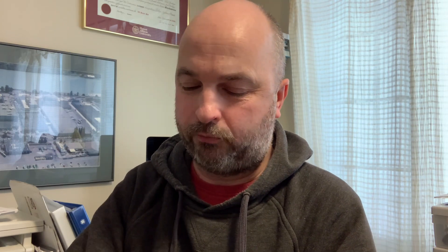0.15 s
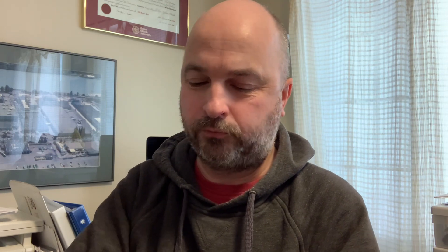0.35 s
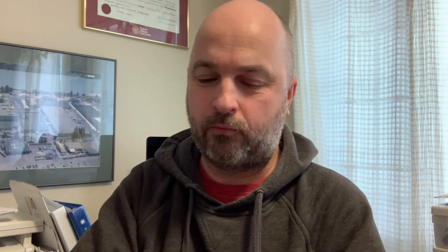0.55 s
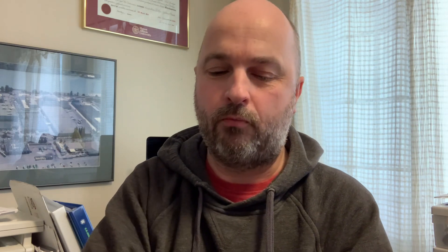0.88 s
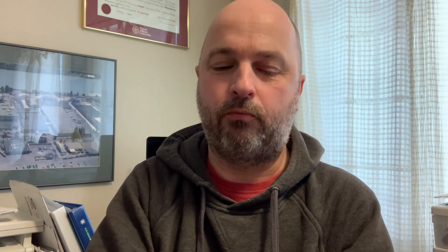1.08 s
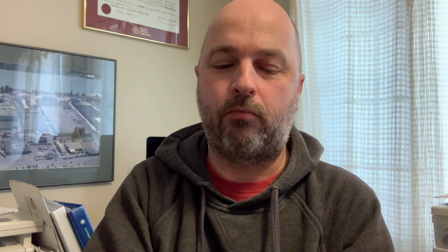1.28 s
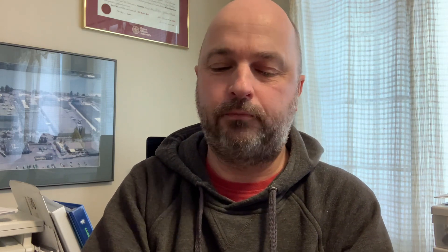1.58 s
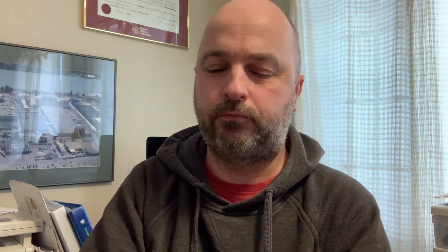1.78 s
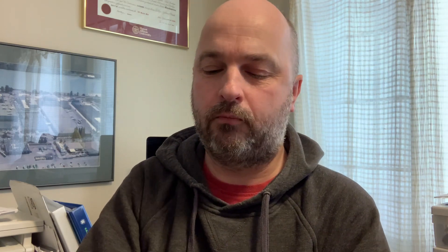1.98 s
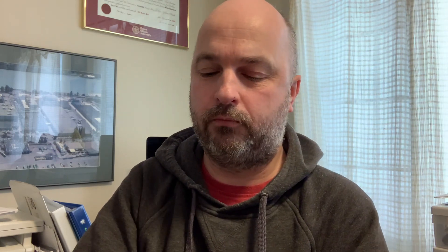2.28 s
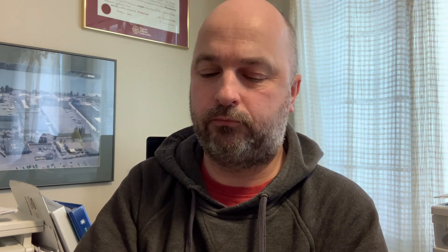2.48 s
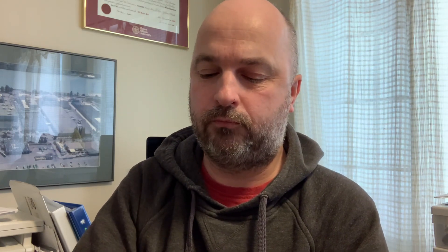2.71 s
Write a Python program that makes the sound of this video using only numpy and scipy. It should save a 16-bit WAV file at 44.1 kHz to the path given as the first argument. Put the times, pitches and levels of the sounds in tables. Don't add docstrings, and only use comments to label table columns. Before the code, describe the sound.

Crisp plastic film being gripped, twisted and pulled open, snapping and crackling in a quiet office

```python
import sys
import numpy as np
from scipy import signal
from scipy.fft import rfft, irfft, next_fast_len
from scipy.io import wavfile

SR = 44100
rng = np.random.default_rng(int(sys.argv[2]) if len(sys.argv) > 2 else 0)


def gain_from_db(level_db):
    decades = np.asarray(level_db, float) / 20
    return 10 ** decades


def int16_out(signal):
    q = np.round(np.clip(np.atleast_2d(signal).T, -1, 1) * 32767)
    wavfile.write(sys.argv[1], SR, q.astype(np.int16))


N = 125685


def rms_one(x):
    return x / np.sqrt(np.mean(x ** 2) + 1e-20)


def at_hz(points, hz):
    table_hz, value = np.array(points)[:, :2].T
    return np.interp(np.log(hz + 1), np.log(table_hz), value)


def drift(rate):
    r = np.exp(-80 * np.pi * rate / SR)
    white = rng.standard_normal(N // 40 + 2002)
    slow = signal.lfilter([1], [1, -2 * r, r * r], white)[2000:]
    return np.interp(np.arange(N) / 40, np.arange(len(slow)), rms_one(slow))


def band(x, low, high):
    return signal.sosfilt(signal.butter(2, [low, high], "band", fs=SR, output="sos"), x)


def room_tone():
    # frequency_hz, level_db per Hz
    air_colour = [(25, -25), (70, -1), (150, -7.5), (300, -4.5), (900, -9.5), (3300, -14.5), (8500, -14.5),
                  (15000, -16.5)]
    air_db, hum_db = -59, -75
    hum_hz, hum_width_hz = 148.87, 18.2
    hz = np.arange(N // 2 + 1) * SR / N
    white = rfft(rng.standard_normal((2, 2, N)))
    air = rms_one(irfft(white[0] * gain_from_db(at_hz(air_colour, hz)) * (hz > 15), N))
    resonance = 1 / (1 + ((hz - hum_hz) / hum_width_hz * 2) ** 2)
    hum = rms_one(irfft(white[1] * resonance, N))
    lumps = band(air, 32, 731) * (gain_from_db(4.5 * drift(11)) - 1)
    return gain_from_db(air_db) * (air + lumps) + gain_from_db(hum_db + 2 * drift(2)) * hum


def drag():
    # frequency_hz, level_db
    hollows = [(710, -59.5), (1900, -68)]
    width_hz, end_s = 83.5, 0.144
    rub = 0
    for hz, db in hollows:
        friction = band(rng.standard_normal(N), hz - width_hz / 2, hz + width_hz / 2)
        rub = rub + gain_from_db(db) * rms_one(friction)
    return rub / (1 + (np.arange(N) / SR / end_s) ** 6)


def creases(s, db, low_db, high_db, pitch_hz):
    # frequency_hz, level_db per Hz
    film_colour = [(400, -21.5), (700, -3), (1300, 0), (3000, -4), (6000, -4), (9000, 9.5), (12500, -8.5),
                   (15500, -10)]
    patch_db, ring_db, ring_octaves = 1.5, 11, 0.262
    snap_t60_s, snap_cycles = .0036, 4
    rise_s, late_cycles = .0002, -1.0
    swell_db, swell_s = -14.5, 0.00145
    click_hz = 1800

    edges = 400 * 2 ** np.arange(0, 5.5, 1 / 3)
    patch = patch_db * rng.standard_normal((len(s), 16))
    sign = rng.choice([-1, 1], (len(s), 16))
    rise = np.exp(-1 / (rise_s * SR))
    swell = np.exp(-1 / (swell_s * SR))
    white = rng.standard_normal((2, 2, N))
    out = 0
    for k, (low, high) in enumerate(zip(edges, edges[1:])):
        hz = np.sqrt(low * high)
        to_low, to_high = np.clip(np.log2([3000 / hz, hz / 5000]) / [2, 1], 0, 1)
        level_db = db + to_low * low_db + to_high * high_db + at_hz(film_colour, hz) + patch[:, k]
        octaves_off = np.log2(hz / pitch_hz)
        level_db = level_db + ring_db * np.exp(-.5 * (octaves_off / ring_octaves) ** 2)

        at = np.clip(((s + late_cycles / hz) * SR).astype(int), 0, N - 1)
        power, clicks = np.full(N, 1e-18), np.zeros((2, N))
        np.add.at(power, at, gain_from_db(2 * level_db))
        np.add.at(clicks[0], at, gain_from_db(level_db) * sign[:, k])

        before = gain_from_db(2 * swell_db) * signal.lfilter([1], [1, -swell], power[::-1])[::-1]
        fade = gain_from_db(-2 * 60 / ((snap_t60_s + snap_cycles / hz) * SR))
        after = signal.lfilter([1 - rise], np.convolve([1, -fade], [1, -rise]), power)
        burst = np.sqrt(after + before) * white[k % 2]
        clean = np.array([[1 / (1 + (hz / click_hz) ** 2)], [0]])
        snap = np.sqrt(1 - clean) * burst + np.sqrt(clean / (1 - fade)) * clicks
        out = out + band(snap, low, high)
    return out * np.sqrt(SR / 2 / 4500)


def wrapper():
    # start_s, level_db, low_share_db,
    # high_share_db, pitch_hz
    film_snaps = [(0.0153, -57.5, 22, 19, 2140), (0.0815, -36.5, -20.5, 6, 600),
                  (0.2211, -27, -15, 2.5, 584), (0.2482, -31, 3, -2.5, 1010),
                  (0.2785, -47.5, -2, 15.5, 4210), (0.2915, -32, -7.5, 0.5, 600),
                  (0.3134, -38, -12, 7, 600), (0.322, -31, -4, -1.5, 908), (0.3377, -25.5, -8.5, -18, 963),
                  (0.353, -24, -9, -16, 914), (0.3601, -13.5, -16, -10.5, 710),
                  (0.3788, -37, -12.5, -10, 600), (0.3962, -18, -18.5, -8.5, 644),
                  (0.4029, -21.5, 5, 7.5, 4400), (0.4685, -32.5, -13.5, -11, 600),
                  (0.489, -25.5, -13.5, 4.5, 3615), (0.5354, -27.5, 1, 1.5, 2956),
                  (0.5482, -20.5, -7.5, -19.5, 587), (0.5578, -19, -17.5, -10, 595),
                  (0.5621, -23, -9, -11, 596), (0.5967, -31, -2.5, 8, 600), (0.604, -20, -21, -3, 600),
                  (0.629, -29, -20.5, 1, 600), (0.6608, -16, -9.5, -11.5, 1266),
                  (0.675, -29.5, -9, -9, 1316), (0.7422, -42, -1, -3, 4990), (0.7594, -37, -9, -6.5, 2520),
                  (0.7971, -42, 0.5, -6, 4580), (0.8019, -28, 6, 2, 2890), (0.818, -47.5, 8.5, 9.5, 3550),
                  (0.8294, -47, 3, 12.5, 5050), (0.84, -32, -22, 1.5, 600),
                  (0.8445, -31, -11.5, -2.5, 1010), (0.8561, -43.5, -16.5, 8, 650),
                  (0.8643, -32.5, -4.5, 14, 2970),
                  (0.8694, -31.5, -8, 6, 713), (0.8837, -40.5, -4.5, 19, 2760),
                   (0.9797, -43.5, -6.5, -17.5, 2132), (0.994, -51, 12, -14.5, 3270),
                   (1.016, -42, 2.5, 4.5, 650), (1.0274, -50.5, 4.5, 11.5, 4978),
                   (1.038, -32.5, -5.5, 3, 1800), (1.0523, -28, -7.5, 3, 6000), (1.0601, -35, 2, 0, 1410),
                   (1.0721, -32.5, -7, 13, 603), (1.082, -36, 10.5, -1, 1820), (1.1126, -48, -6, 6.5, 5430),
                   (1.1325, -29.5, -7, 3, 4630), (1.1761, -31, -7.5, 0, 1003),
                   (1.2001, -34.5, -5, 13, 5660), (1.218, -45.5, 13.5, 4, 4580), (1.231, -27, 9.5, 8, 5510),
                   (1.2752, -30, -2.5, 9, 5270), (1.3266, -42.5, -19.5, 8, 600),
                   (1.3623, -52.5, 12, 9, 5885), (1.498, -55.5, -6, 6.5, 600),
                   (1.504, -37, -11.5, -2.5, 1399), (1.5335, -27, -9.5, 9.5, 653.1),
                   (1.5959, -42, -14.5, 14, 4512), (1.6122, -44, -9.5, -2, 7040),
                   (1.6197, -38, -6.5, -0.5, 845.2), (1.6386, -55.5, -12, 19, 710),
                   (1.6619, -30, -6, 1.5, 719.2), (1.7264, -27, 7.5, 11, 4400),
                   (1.7369, -33.5, 1.5, 10.5, 1665), (1.7789, -32, -21, -0.5, 1782),
                   (1.802, -24, -8, 4, 703.4), (1.824, -35, -19, 4, 600), (1.8554, -34, -14, 1, 600),
                   (1.8759, -44, -7.5, 20.5, 600),
                  (1.951, -34, -16.5, -8, 603.3), (2.0077, -33, -11, -7.5, 840),
                  (2.0372, -44, -11, 12, 600.4), (2.0459, -35.5, -1, 12, 4850),
                  (2.054, -33, -23.5, 4.5, 600), (2.11, -37, -22.5, -10.5, 603),
                  (2.1215, -28, -11, -1, 1000), (2.1395, -30, -5.5, -4, 3320),
                  (2.2102, -30.5, 10.5, 6, 5000), (2.22, -29, 2, -10.5, 603),
                  (2.2524, -41.5, -19, 7, 605.5), (2.2915, -24, -21.5, -16, 2330),
                  (2.3003, -31, -12.5, -11.5, 2330), (2.308, -27, -25, -11, 600),
                  (2.3208, -29, -10, 4, 7050), (2.3604, -39.5, 2, 9.5, 1520), (2.3705, -35, -16.5, 3, 1520),
                  (2.4, -36.5, -22.5, -3.5, 600), (2.4069, -33.5, -4, 8, 1650),
                  (2.4192, -31.5, -9.5, -1.5, 3000), (2.4302, -22, -21, -0.5, 599.1),
                  (2.4479, -22, -3.5, 1.5, 1450), (2.4589, -34, -11, -8.5, 1690),
                  (2.4755, -50, -17, -10.5, 1680), (2.4826, -29.5, -10, -8, 3540),
                  (2.505, -30.5, -7.5, 1, 2330), (2.5623, -39, -4, 12, 2760),
                  (2.5848, -24.5, -23.5, 8, 1090), (2.6161, -31.5, -8.5, -7, 1520),
                  (2.6589, -31, -8, -4, 1956), (2.6656, -42, 5.5, 9.5, 590), (2.6833, -37.5, 2, 9, 596),
                  (2.7257, -41.5, -3.5, 0, 4120), (2.7528, -37, -3.5, -32, 600),
                  (2.8086, -55.5, -5, 12.5, 597)]
    # start_s, length_s, crackle_level_db
    squeezes = [(0.025, .12, -61.5), (0.225, .07, -52), (0.31, .11, -45.5), (0.524, 0.074, -47.5),
                (0.76, 0.1033, -53), (0.798, 0.09264, -46.5), (0.981, 0.12, -53), (1.13, 0.013926, -45),
                (1.41, 0.147, -63.5), (1.553, 0.1, -58.5), (1.914, .04, -52.5), (2.034, .03, -46.5),
                (2.104, 0.046, -50.5), (2.289, .07, -50), (2.396, .11, -45), (2.543, 0.0951, -55.5),
                (2.655, 0.0584, -57), (2.755, 0.0296, -59.5)]
    idle_db, ease_s = -65, 0.0058
    crackles_per_s, clump_db = 450, 3.5
    crackle_db, crackle_spread_db = -2, 3.5

    s, db, low_db, high_db, hz = np.transpose(film_snaps)
    t, grip = np.arange(N) / SR, gain_from_db(idle_db)
    for start, length, level_db in squeezes:
        inside_s = np.minimum(t - start, start + length - t)
        grip = grip + gain_from_db(level_db) * np.clip(inside_s / ease_s + .5, 0, 1)
    effort = 20 * np.log10(grip)

    density_db = .3 * (effort - effort.mean()) + clump_db * drift(15)
    born = rng.random(N) < crackles_per_s * gain_from_db(density_db) / SR
    size = crackle_db + effort + crackle_spread_db * np.minimum(rng.exponential(1, N), 3)
    low, high = 3.57 * rng.standard_normal((2, N)) + [[-3.0], [3.5]]
    pitch = 800 * 2 ** (2.785 * rng.random(N))
    return creases(np.r_[s, np.nonzero(born)[0] / SR], np.r_[db, size[born]],
                   np.r_[low_db, low[born]], np.r_[high_db, high[born]], np.r_[hz, pitch[born]])


def bumps():
    # start_s, peak_db, pitch_hz
    knocks = [
        (0.403, -52, 234.6),
        (0.567, -51.5, 196),
        (2.222, -46.5, 146.8),
        (2.667, -49, 250.4),
    ]
    rise_s, decay_cycles = 0.0012, 15.3
    t, out = np.arange(N) / SR, 0
    for s, db, hz in knocks:
        age = np.maximum(t - s, 0)
        envelope = gain_from_db(db - 60 * age * hz / decay_cycles) * (1 - np.exp(-age / rise_s))
        out = out + envelope * np.sin(2 * np.pi * hz * age)
    return out


def office(x):
    # delay_s, level_db
    reflections = [(.0021, -14), (0.013, -29)]
    # frequency_hz, t60_s
    decay_times = [(500, 0.1), (2000, 0.2472), (6000, 0.1775), (15000, 0.0285)]
    room_db, rise_s = -9.5, .004
    size = SR // 2
    t, tail = np.arange(size) / SR, 0
    edges = 60 * 2.0 ** np.arange(9)
    for low, high in zip(edges, np.r_[edges[1:-1], 18000]):
        decay = gain_from_db(-60 * t / at_hz(decay_times, np.sqrt(low * high)))
        tail = tail + band(rng.standard_normal((2, size)), low, high) * decay
    tail = tail * (1 - np.exp(-t / rise_s))
    reply = gain_from_db(room_db) * rms_one(tail) / np.sqrt(size)
    reply[:, 0] += 1
    for s, db in reflections:
        reply[:, int(s * SR)] += gain_from_db(db)
    return signal.fftconvolve(x, reply, axes=1)[:, :N]


def scene():
    return office(wrapper() + bumps()) + room_tone() + drag()


def roll_off(x):
    return signal.sosfilt(signal.butter(12, 16970, fs=SR, output="sos"), x)


def record(dry):
    # frequency_hz, likeness (0-1)
    likeness = [(100, .2), (600, .7), (2000, .5), (5000, .25), (6500, .45), (7800, .97), (9300, .99),
                (11000, .88), (13000, .94)]
    # frequency_hz, lead_rad
    left_lead = [(0, -1.2), (1300, -.5), (3000, -1.4), (4800, 0), (5200, 2.6), (6200, 1.4), (7700, 2.95),
                 (10200, 3.35), (12700, 6.0), (14500, 6.3)]
    # frequency_hz, lean_db
    left_lean = [(150, 6), (450, 1), (2000, 0)]
    size = next_fast_len(N + 4096)
    hz = np.arange(size // 2 + 1) * SR / size
    shared, own = rfft(dry, size)
    alike = np.clip(at_hz(likeness, hz), 0, 1)
    side = np.array([[.5], [-.5]])
    ports = np.sqrt((1 + alike) / 2) * shared + np.sqrt((1 - alike) / 2) * own * 2 * side
    lead = np.interp(hz, *np.transpose(left_lead))
    ports = ports * gain_from_db(side * at_hz(left_lean, hz)) * np.exp(1j * side * lead)
    top_cut = signal.cheby1(8, 1, 15800, fs=SR, output="sos")
    return roll_off(signal.sosfilt(top_cut, irfft(ports, size)[:, :N]))


dry = scene()
out = record(dry)
int16_out(out)
```